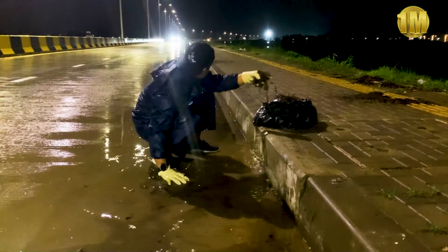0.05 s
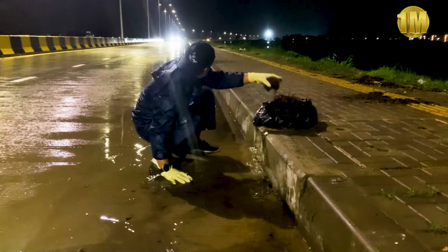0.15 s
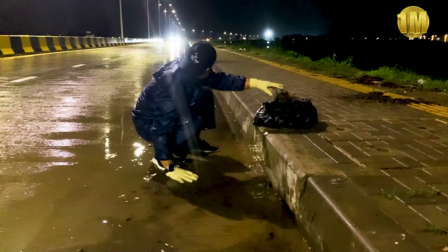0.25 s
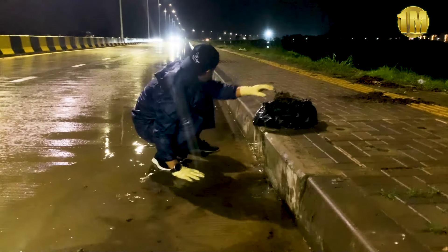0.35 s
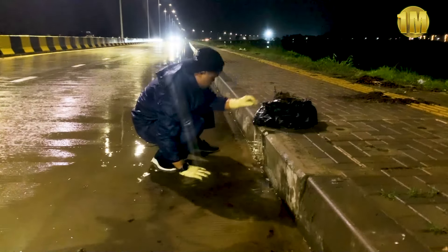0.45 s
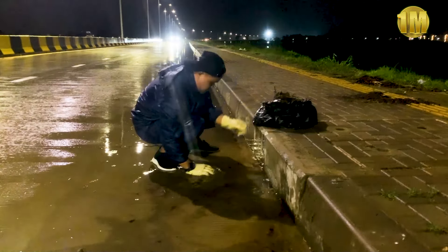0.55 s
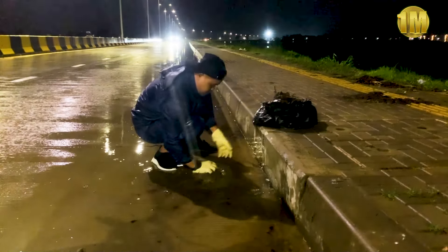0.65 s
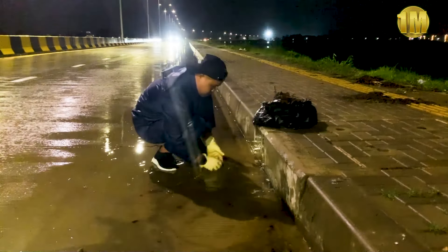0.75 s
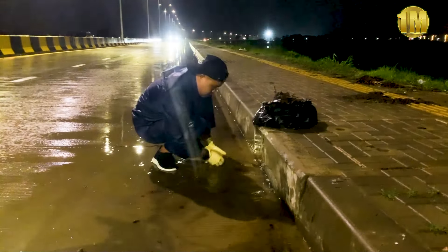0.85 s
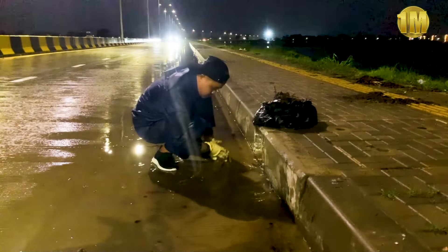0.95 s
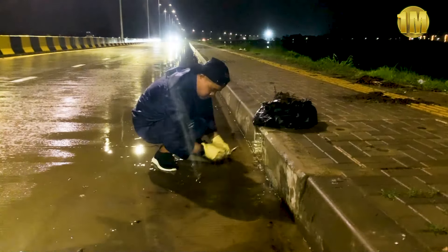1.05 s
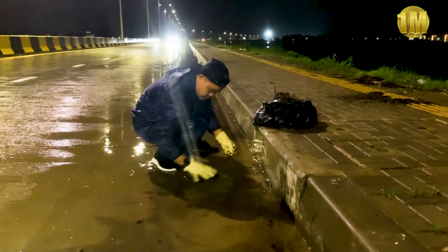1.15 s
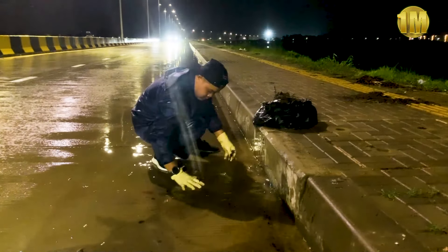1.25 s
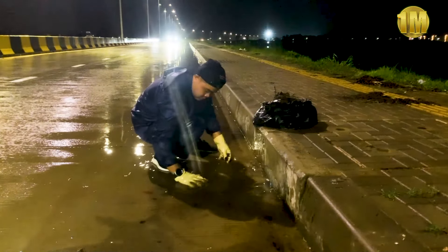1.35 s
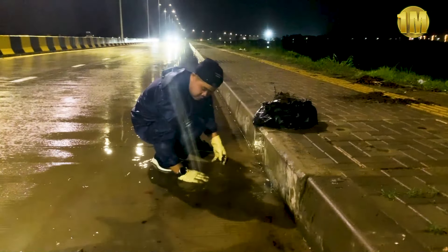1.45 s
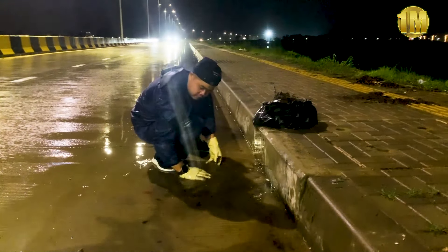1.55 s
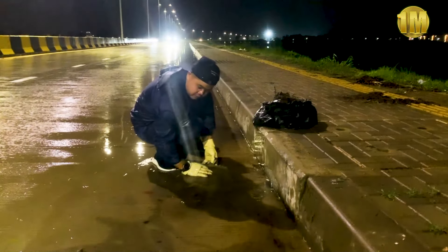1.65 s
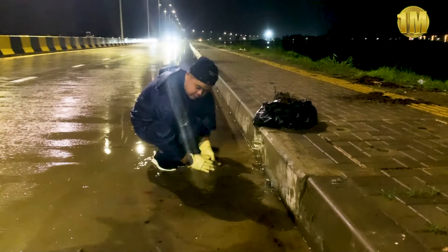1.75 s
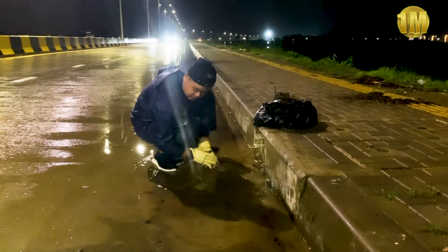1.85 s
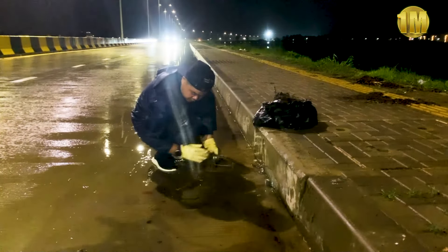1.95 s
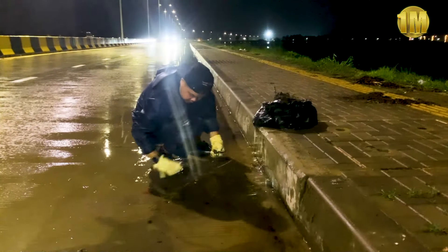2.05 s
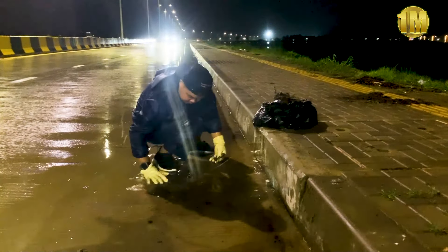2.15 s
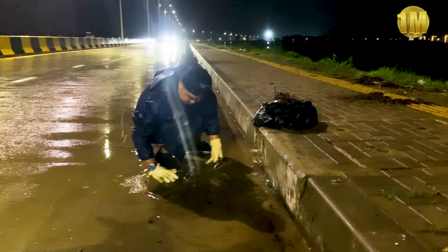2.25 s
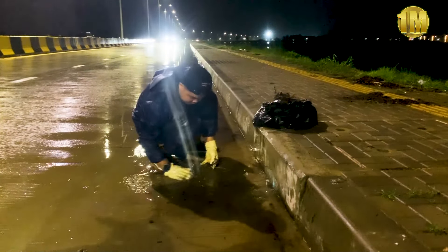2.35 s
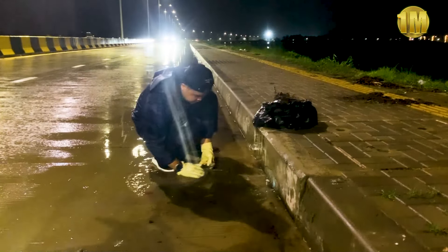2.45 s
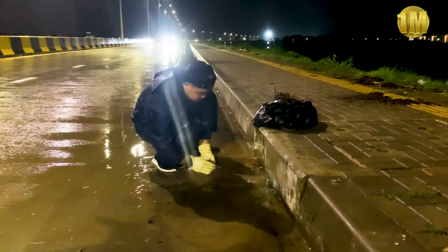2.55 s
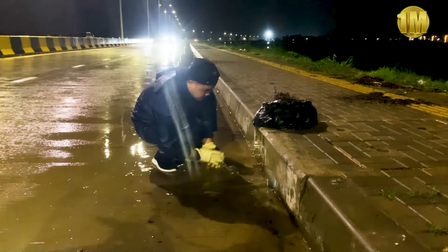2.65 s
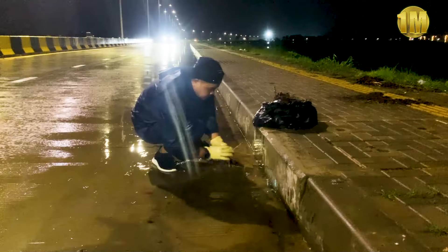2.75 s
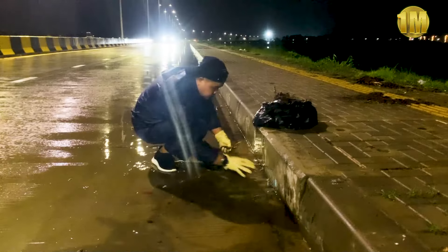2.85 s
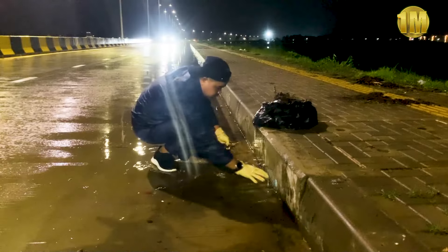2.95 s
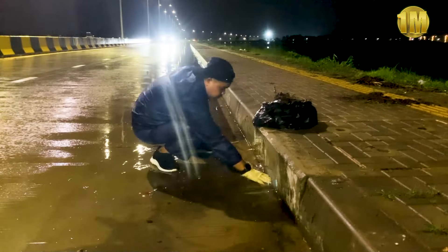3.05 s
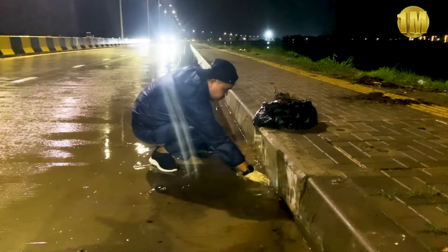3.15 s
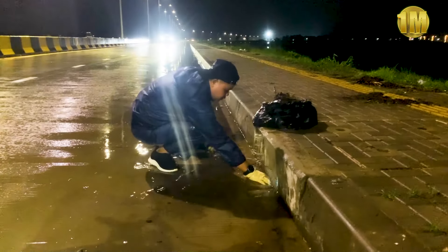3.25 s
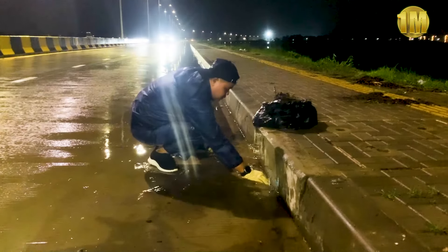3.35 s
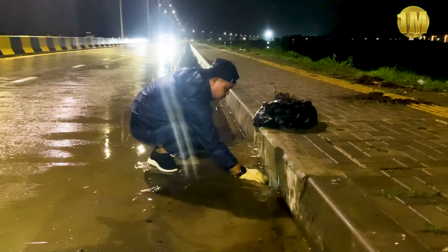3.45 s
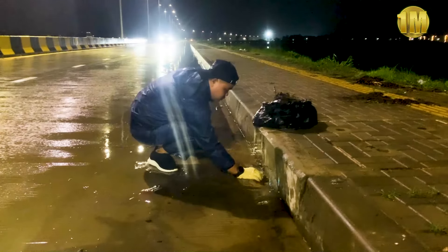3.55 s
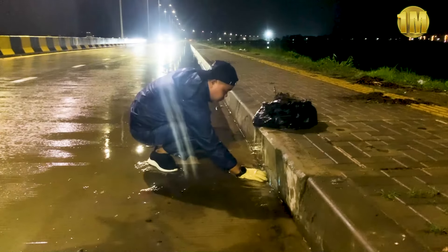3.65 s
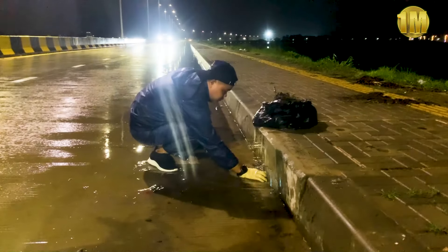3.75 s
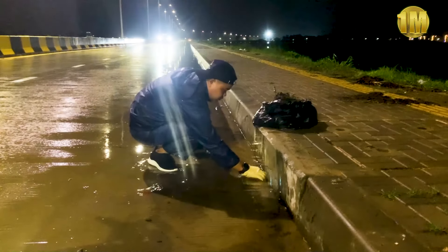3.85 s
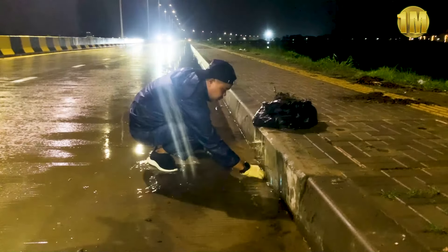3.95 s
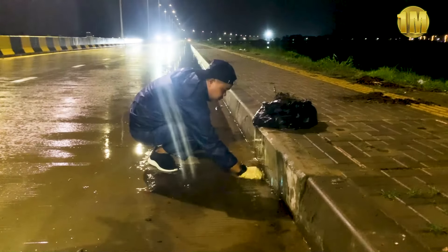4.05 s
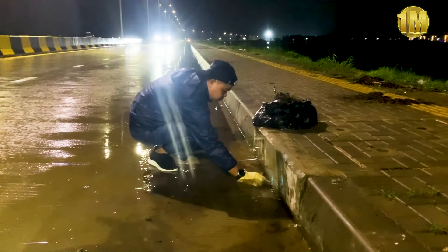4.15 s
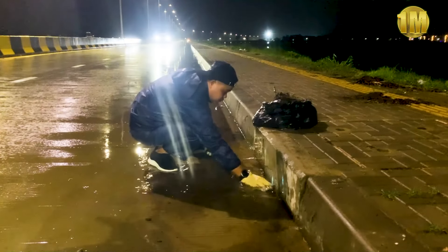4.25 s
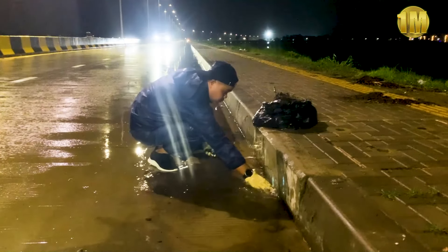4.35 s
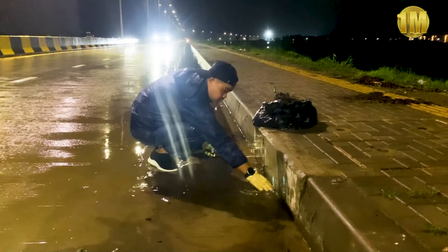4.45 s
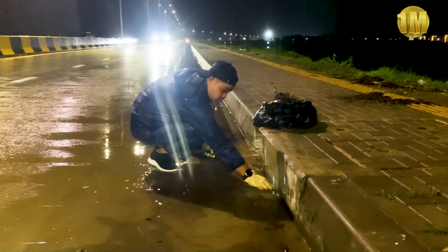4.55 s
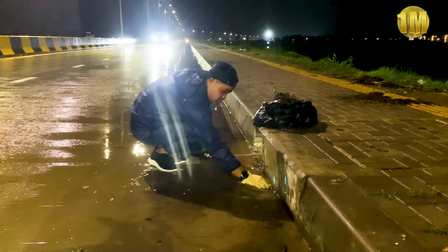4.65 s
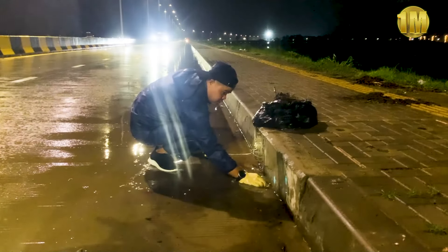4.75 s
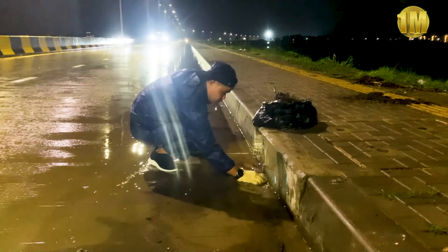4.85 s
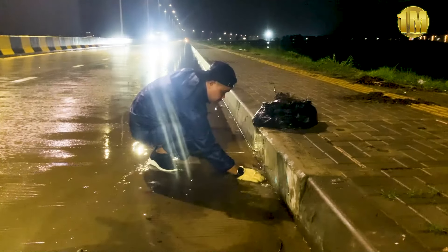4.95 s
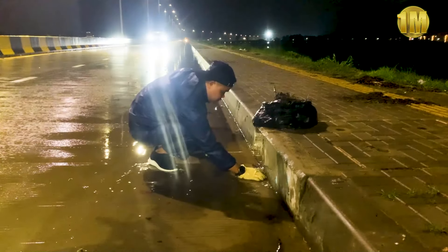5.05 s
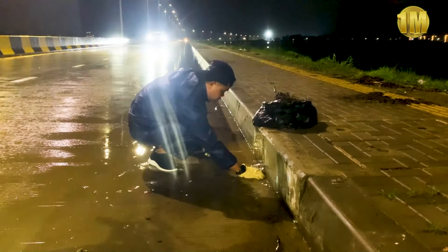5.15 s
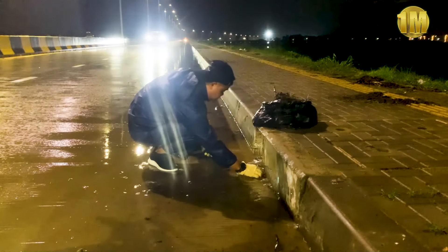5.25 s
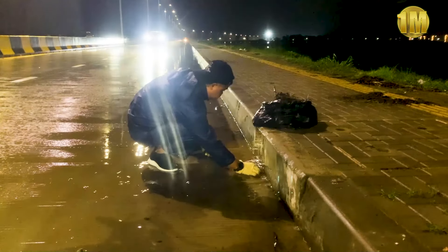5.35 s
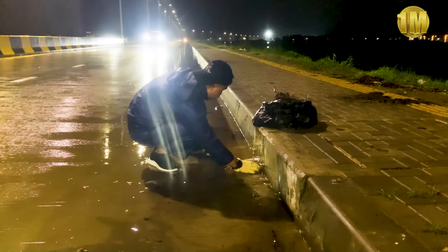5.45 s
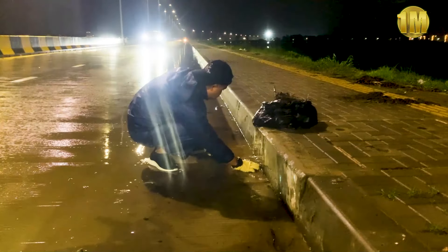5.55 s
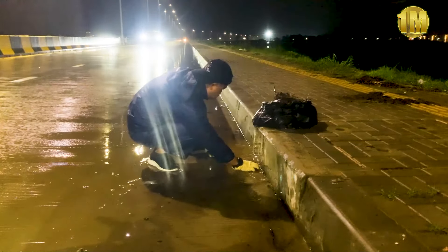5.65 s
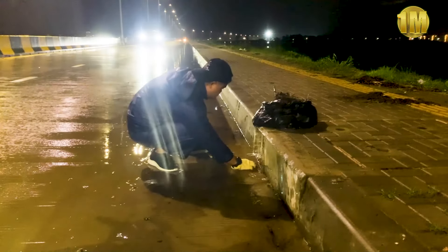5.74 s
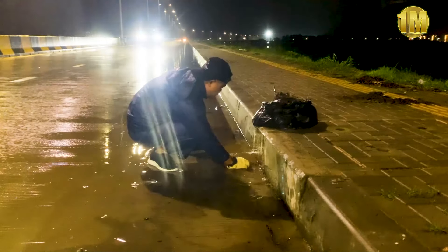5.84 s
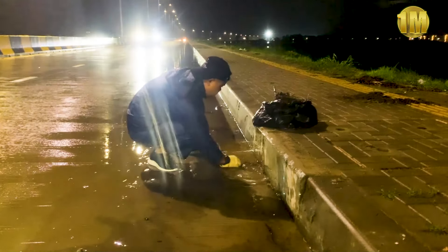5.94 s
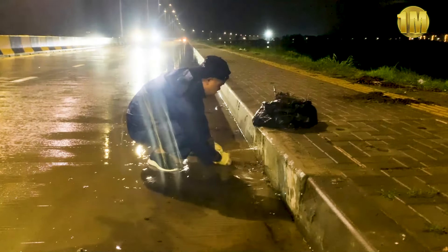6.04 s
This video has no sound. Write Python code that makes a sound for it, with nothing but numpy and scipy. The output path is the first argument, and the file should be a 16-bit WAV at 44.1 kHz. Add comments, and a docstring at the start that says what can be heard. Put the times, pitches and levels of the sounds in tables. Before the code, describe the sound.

Close to the microphone, someone clears a flooded gutter by hand: jacket sleeves swish, drops splash, bubbles ping and mud plops softly. Midway, water squirts from under a glove and a hand knocks once on the kerb. Distant traffic murmurs throughout. In the second half a car approaches along the wet road, its uneven low rumble swelling over a faint tyre hiss.

```python
"""A wet road at night

A car approaches from far off, its low rumble swelling under the roar and hiss of its tyres.
Close by, someone in a rain jacket clears a flooded gutter by hand: sleeves swish, drops splash,
trapped bubbles ping and air pockets plop. Behind it all, a distant engine hum sinks away,
a thin whine hangs in the air and far traffic murmurs."""
import sys
import numpy as np
from scipy import signal
from scipy.fft import rfft, irfft, next_fast_len
from scipy.io import wavfile
from scipy.ndimage import uniform_filter1d, map_coordinates

SR = 44100
rng = np.random.default_rng(int(sys.argv[2]) if len(sys.argv) > 2 else 0)


def to_wav(sig):
    """Store sig (one row per channel, or 1-D mono) as 16-bit WAV at the path in sys.argv[1].

    Samples outside -1..1 are clipped; the rate is SR.
    """
    pcm = np.clip(np.atleast_2d(sig), -1, 1) * 32767
    pcm = np.round(pcm).astype(np.int16)
    wavfile.write(sys.argv[1], SR, pcm.T)  # frames by channels


N = 268683
TIME = np.arange(N) / SR  # seconds


# how the car's rumble swells: (time [s], relative level [dB])
RUMBLE_LEVELS = [(4.0, -39), (4.08, -34.5), (4.25, -32.5), (4.55, -28.5), (4.78, -28.5), (4.88, -31),
                 (4.95, -26.5), (5.03, -28.5), (5.15, -31), (5.2, -22.5), (5.27, -23), (5.4, -23.5),
                 (5.56, -17), (5.61, -32), (5.68, -22), (5.81, -20.5), (5.89, -32), (5.97, -28)]
# the deep rumble, from low to high: (frequency [Hz], relative level [dB])
RUMBLE_SPECTRUM = [(20, -42), (35, -13.5), (60, 3.5), (90, 7), (130, 3.5), (200, -9.5), (300, -16),
                   (400, -26.5), (500, -79), (700, -39.5)]
# the higher growl: (time [s], level against the deep rumble [dB])
GROWL_LEVELS = [(3.8, -14), (4.15, -10), (5.4, -11), (5.7, -20)]

def car_rumble(emerged_s=3.57, climb_db_per_s=5.5):
    """The car's uneven rumble climbs out of the distance; its higher growl gives way near the end."""
    emerging_db = climb_db_per_s * np.minimum(TIME - emerged_s, 0)
    deep = unit(rush(RUMBLE_SPECTRUM, patchy_db=0.2) * amp(2 * wobble(30)))
    growl = amp(curve(GROWL_LEVELS)) * band_noise(hz=195, width=0.41, t=TIME)
    return amp(curve(RUMBLE_LEVELS) + emerging_db - 1) * (deep + growl)


# the tyres' roar and their spray: (frequency [Hz], relative level [dB])
ROAR_SPECTRUM = [(650, -0.5), (900, -11.5), (1200, -8), (1550, -12.5), (1950, -6), (2250, -70), (3000, -61),
                 (4200, -20.5)]
SPRAY_SPECTRUM = [(2400, 3), (3300, 0.5), (4100, -1.5), (4600, -6), (5100, -5.5), (6400, 4), (8000, 1.5),
                  (9500, -4.5), (11000, -11), (12500, -17.5), (15000, -24.5)]

def tyres(arrives_s=7.95, far_hiss_db=-60.5):
    """Tyres roar and throw spray as the car nears; the spray outgrows the steady hiss of far traffic."""
    # at a steady speed, half the time left means half the distance
    doublings = np.log2(arrives_s - TIME)
    roar = amp(-51 - 3.09 * doublings) * rush(ROAR_SPECTRUM, patchy_db=2)
    spray_gain = np.hypot(amp(far_hiss_db), amp(-43 - 15.5 * doublings))
    return roar + spray_gain * rush(SPRAY_SPECTRUM, patchy_db=2)


def tread_song(hz=1292, peak_s=3.85, fall_db_per_s=7.5):
    """The tyre tread sings a fuzzy note that swells and fades."""
    db = -64.5 - fall_db_per_s * np.abs(TIME - peak_s) + 2 * wobble(25.3)
    return amp(db) * tone(hz * (1 + 0.0175 * wobble(120)))


def bass_swell():
    """The deepest bass swells briefly before the car's rumble takes over."""
    return amp(-42) * hump(peak_s=3.17, half_s=0.25) * band_noise(hz=58, width=0.11, t=TIME)


# sweeps of sleeve and glove: (time [s], half length [s], level [dB])
ARM_SWEEPS = [(0.504, 0.057, -56.5), (0.995, 0.043, -55.5), (1.898, 0.037, -51.5), (2.051, 0.066, -58.5),
              (2.444, 0.15, -63), (2.712, 0.039, -54), (2.797, 0.099, -59.5), (4.277, 0.012, -57)]
# their swish: (frequency [Hz], relative level [dB])
SWISH_SPECTRUM = [(1500, 4.5), (2500, -1), (3300, -1), (4500, -1.5), (5500, 4), (7500, 8.5), (9500, -2),
                  (12000, -9), (15000, -39)]

def sweeps(grain_db=2.5):
    """Each sweep of the arm swells and fades as a broad, grainy swish."""
    strokes = sum(amp(db) * hump(s, half_s) for s, half_s, db in ARM_SWEEPS)
    cloth = rush(SWISH_SPECTRUM, patchy_db=0.5)
    return strokes * unit(cloth * amp(grain_db * wobble(250)))


def spatter(drops_per_sweep=45, centre_hz=7200, octaves=0.48):
    """Each sweep through the water throws crackling droplets, thickest in mid-stroke."""
    out, t = np.zeros((2, N)), TIME[:SR // 100]
    for s, half_s, db in ARM_SWEEPS:
        for when, pitch, size, pan in rng.standard_normal((drops_per_sweep, 4)):
            ring = sine(centre_hz * 2 ** (octaves * np.tanh(pitch)), t)
            drop = amp(db - 4.5 + 4 * size) * fade(t, 0.006) * ring
            add(out, s + half_s * when, drop * np.exp(-when ** 2 / 4), pan_db=3 * pan)
    return out


# squirts of water: (time [s], relative level [dB], fade time [s])
WATER_SQUIRTS = [(2.66, -43.5, 0.46)]
# the notes of the gap under the glove: (pitch [Hz], width [Hz], relative level [dB])
GAP_NOTES = [(2525, 200, -3.5), (5300, 350, 0), (6150, 300, 0), (6700, 250, 0), (7600, 220, 0)]

def squirts(attack_s=0.045, sag_per_s=0.11):
    """Water pressed from under the glove sputters through a gap whose notes sink as it opens."""
    out = np.zeros((2, N))
    for s, db, fade_s in WATER_SQUIRTS:
        age = np.maximum(TIME - s, 0)
        sag = 1 / (1 + sag_per_s * age)
        jet = sum(amp(level) * wobble(width) * tone(hz * sag + width / 2 * wobble(width))
                  for hz, width, level in GAP_NOTES)
        out += amp(db) * rise(age, attack_s) * fade(age, fade_s) * unit(jet)
    return out


# fingers, then palm, hit the kerb: (time [s], relative level [dB])
HAND_KNOCKS = [(3.7457, -35), (3.7483, -32.5)]
# the notes in each knock: (pitch [Hz], relative level [dB], fade time [s])
KNOCK_NOTES = [(552, -3, 0.064), (740, -1, 0.016), (1030, -6.5, 0.023), (1500, 0.5, 0.011)]

def knocks(thud_hz=76):
    """The gloved hand meets the kerb with a hollow knock over a soft thud."""
    out, t = np.zeros((2, N)), TIME[:SR // 5]
    ring = sum((-1) ** k * amp(level) * fade(t, fade_s) * sine(hz, t)
               for k, (hz, level, fade_s) in enumerate(KNOCK_NOTES))
    thud = amp(2) * rise(t, 0.0042) * fade(t, 0.18) * sine(thud_hz, t)
    for s, db in HAND_KNOCKS:
        add(out, s, amp(db) * (rise(t, 0.00071) * ring + thud))
    return out


# plops of water and mud: (time [s], relative level [dB], pitch [Hz])
MUD_PLOPS = [(1.245, -42, 455), (2.128, -46, 755), (4.299, -43.5, 490), (5.07, -41, 950), (5.401, -45, 860),
             (5.426, -43, 784), (5.456, -46, 900), (5.694, -35, 730), (5.994, -39.5, 800)]
# the notes of an air pocket: (pitch [times the plop's], relative level [dB], fade time [cycles])
POCKET_NOTES = [(.76, -10.5, 10), (1, 2, 16), (1.25, -5, 11), (1.6, 2, 3.5), (2.12, -11.5, 16)]

def plops():
    """Pockets of air collapse under the glove with a short hollow knock."""
    out, t = np.zeros((2, N)), TIME[:SR // 10]
    for s, db, hz in MUD_PLOPS:
        ring = sum((-1) ** k * amp(level) * fade(t, cycles / (hz * ratio)) * sine(hz * ratio, t)
                   for k, (ratio, level, cycles) in enumerate(POCKET_NOTES))
        add(out, s, amp(db) * rise(t, 0.00012) * ring)
    return out


# drips from the gloves: (time [s], relative level [dB], splash pitch [Hz], half width [share of pitch])
GLOVE_DRIPS = [(.032, -41.5, 7600, 0.13), (.068, -39.5, 7660, .09), (0.097, -44, 6500, .06),
               (0.1242, -40, 4000, 0.12), (0.126, -41, 6400, 0.092), (2.032, -43, 6340, .12),
               (2.23, -40, 6700, 0.19), (2.489, -44.5, 6650, .1), (3.083, -38, 7000, .16),
               (3.458, -42, 6700, 0.11), (4.758, -46, 6300, 0.065), (5.068, -43.5, 4960, 0.074)]

def drips(splash_db=-7, click_db=-14):
    """A drop lands with a faint click, then fizzes as tiny bubbles burst together."""
    out, t = np.zeros((2, N)), TIME[:SR // 10]
    shape = rise(t, 0.001) * fade(t, 0.04)
    for s, db, hz, width in GLOVE_DRIPS:
        add(out, s, amp(db + splash_db) * shape * band_noise(hz, width, t))
    return out + clicks([(s, db + click_db, hz) for s, db, hz, _ in GLOVE_DRIPS])


# drops that ping in the puddle: (time [s], level [dB], pitch [Hz], fade time [s])
PUDDLE_PINGS = [(.43, -50, 2340, .025), (1.2827, -46.5, 2490, 0.029), (1.887, -41, 2410, 0.022),
                (2.391, -49, 5840, .03), (2.467, -41, 5260, 0.032), (4.3528, -42.5, 2250, 0.03)]

def bubble_pings(glide_per_s=1.0):
    """A drop traps a bubble that rings briefly, its pitch creeping up."""
    out, t = np.zeros((2, N)), TIME[:SR // 20]
    for s, db, hz, fade_s in PUDDLE_PINGS:
        ring = sine(hz * (1 + glide_per_s * t / 2), t)
        add(out, s, amp(db) * rise(t, 0.00027) * fade(t, fade_s) * ring)
    return out


# ticks of grit: (time [s], relative level [dB], lowest frequency [Hz])
GRIT_TICKS = [(1.244, -52.5, 5120), (2.1266, -46.5, 3000), (3.083, -56, 5500), (3.63, -54, 7000),
              (3.7455, -42, 3480), (4.3512, -41, 7260), (5.068, -52, 6700)]

def grit(left_db=10.5, right_db=15.5):
    """Bits of grit tick against the kerb, a little to the right, as the hands scoop."""
    return amp([[left_db], [right_db]]) * clicks(GRIT_TICKS)


# the click of a drop or of grit: (frequency [Hz], boost or cut [dB])
CLICK_SPECTRUM = [(1000, 9), (3000, 6.5), (5000, 5.5), (6500, 6), (9500, 6.5), (12500, -5), (16000, -16)]

def clicks(rows):
    """Tiny hits make short bright cracks, scattered differently to each microphone."""
    out, t = np.zeros((2, N)), TIME[:SR // 10]
    shape = np.sqrt(rise(t, 0.001)) * fade(t, 0.006)
    for s, db, low_hz in rows:
        crack = amp(db) * shape * rng.standard_normal((2, len(t)))
        highpass = signal.butter(4, low_hz, "highpass", fs=SR, output="sos")
        add(out, s, signal.sosfilt(highpass, crack))
    return filtered(out, lambda hz: colour(CLICK_SPECTRUM, hz))


def patter(count=110, centre_hz=6800):
    """Tiny stray droplets fall around the hands, pitched within half an octave of the centre."""
    out, t = np.zeros((2, N)), TIME[:SR // 50]
    for s, (pitch, size, pan) in zip(rng.uniform(0, N / SR, count), rng.standard_normal((count, 3))):
        ring = sine(centre_hz * 2 ** (np.tanh(pitch) / 2), t)
        add(out, s, amp(-56 + 2.5 * size) * fade(t, 0.01) * ring, pan_db=3 * pan)
    return out


# the notes in the engine's hum: (pitch [times the firing rate], relative level [dB])
ENGINE_NOTES = [(2, -10), (3, -5), (4, -2.5)]

def far_engine(start_hz=63.1, sag_hz_per_s=2.4, peak_s=0.86, rise_db_per_s=4, fade_db_per_s=8.5):
    """A far engine swells, slows and fades; only its low notes carry."""
    firing_hz = (start_hz - sag_hz_per_s * TIME) * (1 + 0.0013 * wobble(13))
    below_peak_db = np.maximum(rise_db_per_s * (peak_s - TIME), fade_db_per_s * (TIME - peak_s))
    hum = sum(amp(db + 0.53 * wobble(7.7)) * tone(k * firing_hz) for k, db in ENGINE_NOTES)
    return amp(-42.5 - below_peak_db) * hum


# how loud the whine is: (time [s], level [dB])
WHINE_LEVELS = [(0, -64), (.8, -61.5), (1.08, -74), (1.4, -61.5), (2.25, -61.5), (2.76, -56.5),
                (3.05, -64.5), (4.6, -67)]

def far_whine(hz=791):
    """A thin, wavering whine comes and goes."""
    db = curve(WHINE_LEVELS) + 2.4 * wobble(12)
    return amp(db) * tone(hz * (1 + 0.006 * wobble(50)))


# how loud the far traffic is: (time [s], level [dB])
TRAFFIC_LEVELS = [(.5, -37.5), (1.6, -39.5), (3.1, -38.5)]
# its murmur: (frequency [Hz], relative level [dB])
TRAFFIC_SPECTRUM = [(20, -52), (32, -22), (55, 4.5), (100, 0.5), (200, -8), (320, -15.5), (480, -19.5),
                    (660, -28.5), (900, -41.5), (1500, -44.5), (2000, -35.5), (2600, -43.5), (4000, -62)]

def far_traffic():
    """Distant cars blend into a low, nearly steady murmur."""
    return amp(curve(TRAFFIC_LEVELS)) * rush(TRAFFIC_SPECTRUM, patchy_db=1.4)


# narrow bands that stand out in the road noise: (frequency [Hz], half width [Hz], boost [dB])
ROAD_PEAKS = [(646, 19, 4), (1506, 59, 8.5), (4052, 79, 8), (4560, 55, 10.5), (6360, 65, 5.5)]
# how far the left side's wave runs ahead of the right's: (frequency [Hz], lead [radians])
LEFT_LEAD = [(40, -1.1), (150, -0.7), (270, 0.6), (500, 2.9), (700, 6.1), (800, 8.6), (900, 7.5),
             (1150, 9.0), (1300, 11.3), (1500, 12.3), (1750, 11.4), (2450, 12.0), (2750, 9.7), (3400, 9.8),
             (4100, 12.8), (6500, 12.1)]

def road():
    """Sound from along the road reaches the two microphones out of step."""
    noise = filtered(far_traffic() + car_rumble() + tyres(), lambda hz: bells(ROAD_PEAKS, hz))
    mix = noise + bass_swell() + far_engine() + far_whine() + tread_song()
    return filtered(mix, lambda hz: np.exp(1j * np.outer([0.5, -0.5], along(LEFT_LEAD, hz))))


# how much louder the left side is than the right: (frequency [Hz], difference [dB])
LEFT_BALANCE = [(60, -3), (130, -3.5), (220, 0.3), (800, 0), (1500, -0.6), (3000, 0), (4500, 1.5),
                (6400, 7), (8000, 5), (9500, -7.5), (12000, -1.5)]
# a dip on both sides: (frequency [Hz], half width [Hz], level change [dB])
MICROPHONE_DIP = [(3040, 84, -5.5)]

def microphones(x):
    """The two microphones share a narrow dip and differ in level."""
    def response(hz):
        sides = amp(np.outer([0.5, -0.5], along(LEFT_BALANCE, hz)))
        return bells(MICROPHONE_DIP, hz) * sides / np.sqrt(np.mean(sides ** 2, axis=0))
    return filtered(x, response)


# how alike left and right sound: (frequency [Hz], likeness [0 to 1])
STEREO_LIKENESS = [(30, 1), (100, 0.82), (330, 0.81), (500, 0.81), (700, 0.52), (1100, 0.7), (2400, 0.86),
                   (3500, 0.25), (10000, 0.034)]

def rush(spectrum, patchy_db):
    """Stereo noise with random louder and softer patches, centred in the bass and wide in the treble."""
    bands = signal.stft(rng.standard_normal((2, N)), nperseg=512)[2]
    patches = uniform_filter1d(rng.standard_normal(bands.shape[1:]), size=6, axis=0)  # across pitch
    patches = uniform_filter1d(patches, size=14, axis=1)  # across time
    pair = signal.istft(bands * amp(patchy_db * unit(patches)), nperseg=512)[1][:, :N]
    def response(hz):
        spread = np.arccos(along(STEREO_LIKENESS, hz)) / 2
        return colour(spectrum, hz) * [np.cos(spread), np.sin(spread)]
    mid, side = filtered(pair, response)
    return unit(np.array([mid + side, mid - side]))


def band_noise(hz, width, t):
    """Noise around hz; width is the band's half width as a share of hz."""
    f = np.fft.rfftfreq(len(t), 1 / SR)
    white = rfft(rng.standard_normal(len(t)))
    return unit(irfft(white / (1 + ((f - hz) / (width * hz)) ** 2), len(t)))


def tone(hz):
    """A pure note of average strength (rms) 1 that follows a changing pitch."""
    return np.sqrt(2) * np.sin(2 * np.pi * np.cumsum(hz) / SR + rng.uniform(0, 2 * np.pi))


def sine(hz, t):
    """A plain wave that starts from zero."""
    return np.sin(2 * np.pi * hz * t)


def rise(t, attack_s):
    """A soft start, about two thirds of the way up after attack_s."""
    return 1 - np.exp(-t / attack_s)


def fade(t, fade_s):
    """A dying away that loses 60 dB in the fade time."""
    return amp(-60 * t / fade_s)


def hump(peak_s, half_s):
    """A smooth swell up to 1 and back down."""
    return np.exp(-((TIME - peak_s) / half_s) ** 2 / 2)


def wobble(rate):
    """A smooth random curve through rate points a second."""
    return map_coordinates(rng.standard_normal(int(N * rate / SR) + 4), [TIME * rate])


def curve(points):
    """Join (time, value) points with straight lines."""
    return np.interp(TIME, *np.transpose(points))


def along(points, hz):
    """Join (frequency, value) points, with octaves evenly spaced."""
    f, values = np.transpose(points)
    return np.interp(np.log(hz + 1), np.log(f + 1), values)


def colour(spectrum, hz):
    """The gain of a spectrum at hz, falling steeply beyond its ends."""
    rolloff = np.minimum(hz / spectrum[0][0], 1) * np.minimum(spectrum[-1][0] / (hz + 1), 1)
    return amp(along(spectrum, hz)) * rolloff ** 4


def bells(rows, hz):
    """The gain of narrow peaks or dips at hz."""
    return amp(sum(db / (1 + ((hz - centre) / width) ** 2) for centre, width, db in rows))


def filtered(x, response):
    """Scale and shift each frequency in x by response(hz)."""
    size = next_fast_len(N + SR // 2)
    return irfft(rfft(x, size) * response(np.fft.rfftfreq(size, 1 / SR)), size)[..., :N]


def amp(db):
    """Turn decibels into a gain to multiply by."""
    return 10 ** (np.asarray(db) / 20)


def unit(x):
    """Scale x to an average strength (rms) of 1."""
    return x / np.sqrt(np.mean(x ** 2) + 1e-20)


def add(track, s, sound, pan_db=0):
    """Mix a short sound into a stereo track at time s; positive pan_db moves it left."""
    part = track[:, max(round(s * SR), 0):][:, :sound.shape[-1]]
    part += amp([[pan_db / 2], [-pan_db / 2]]) * sound[..., :part.shape[1]]


def scene():
    """The road, and the work at the gutter straight ahead."""
    street = road()
    hands = sweeps() + spatter() + squirts() + knocks() + plops() + grit()
    drops = drips() + bubble_pings() + patter()
    return microphones(street + hands + drops)


def record(dry, low_cut_hz=40, top_hz=15700):
    """Turn down the deepest bass and remove the highest treble."""
    return filtered(dry, lambda hz: (hz < top_hz) / np.sqrt(1 + (low_cut_hz / (hz + 1)) ** 10))


dry = scene()
out = record(dry)
to_wav(out)
```